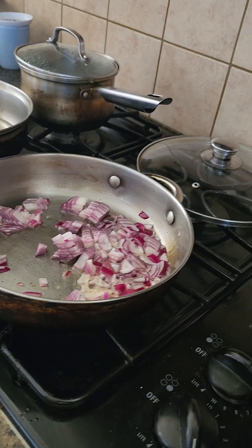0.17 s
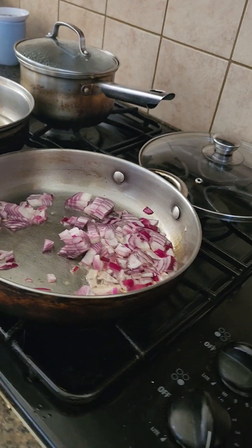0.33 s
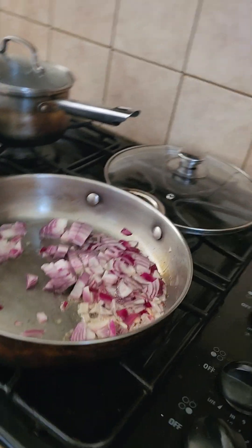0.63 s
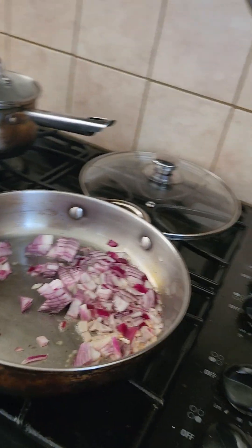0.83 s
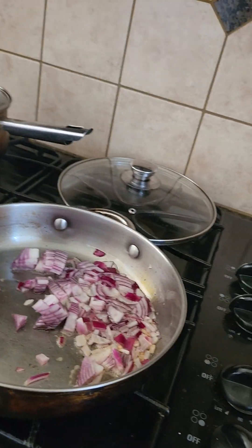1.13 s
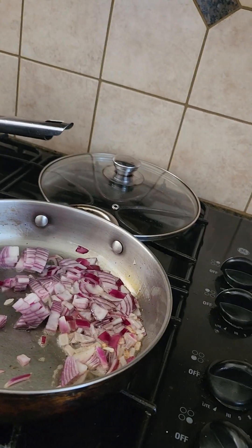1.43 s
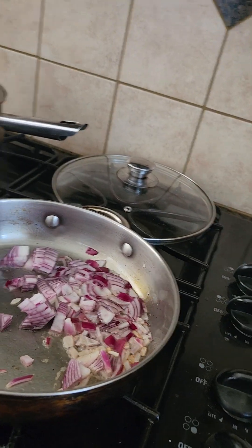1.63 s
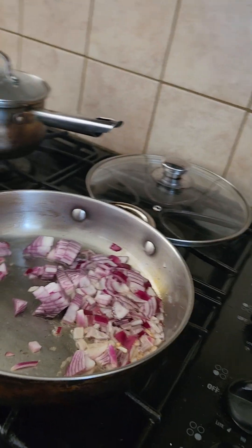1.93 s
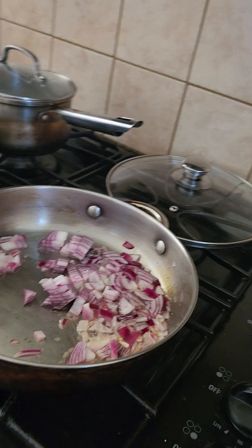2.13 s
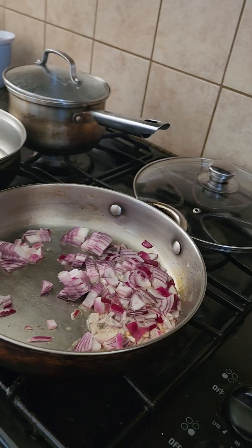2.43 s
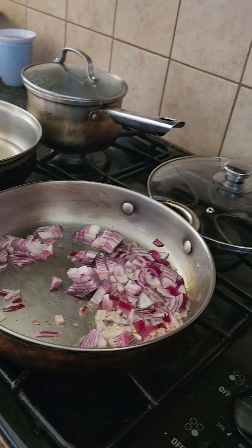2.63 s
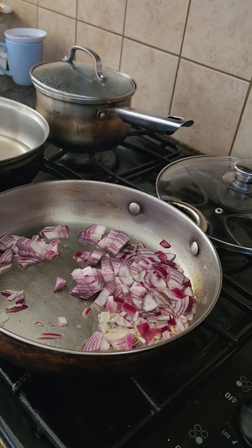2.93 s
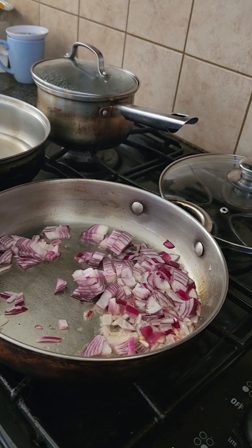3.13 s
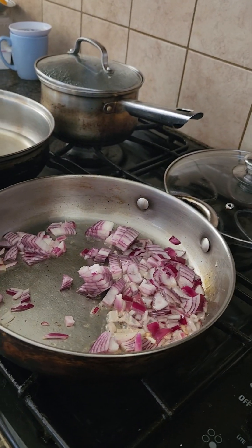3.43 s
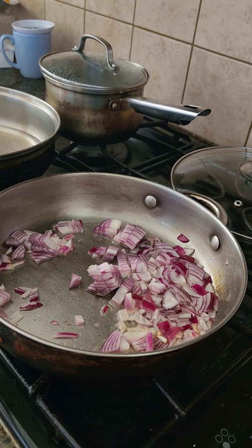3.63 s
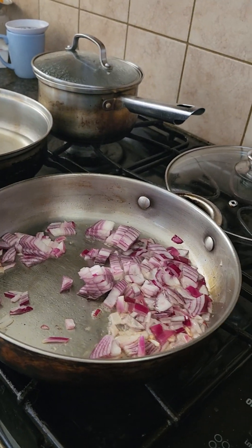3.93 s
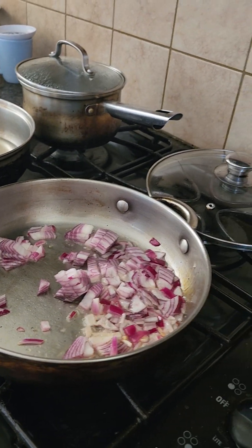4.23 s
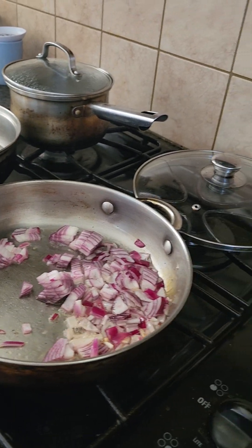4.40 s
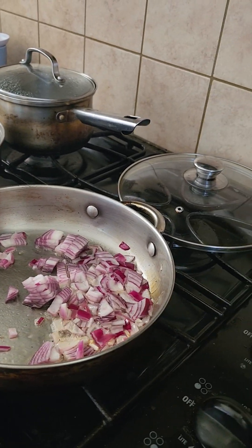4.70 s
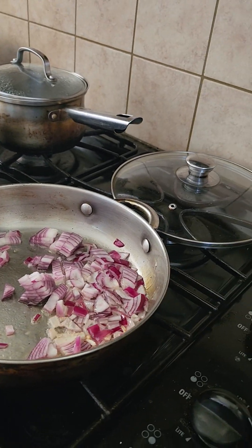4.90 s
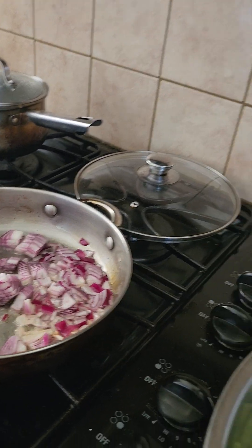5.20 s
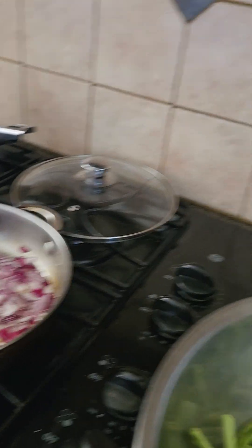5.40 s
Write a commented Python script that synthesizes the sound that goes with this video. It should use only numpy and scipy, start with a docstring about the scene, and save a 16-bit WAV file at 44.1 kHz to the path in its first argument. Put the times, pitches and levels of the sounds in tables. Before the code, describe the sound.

Onion fries close to a phone in a small hard-walled kitchen, the sizzle leaning slightly left. Quick utensil knocks and scrapes open the scene, followed by a quieter spell with snapping oil drops. From about 2.5 seconds come hard clacks, rattling scrapes and faint metallic clinks, then scattered taps to the end, over a soft gas rush and weak hum.

```python
"""Onion sizzling on a gas hob

Chopped onion sizzles in a steel skillet, close to a phone in a small tiled kitchen.
Steam bursts are random grains filtered by an oil colour; spitting drops are one-cycle snaps with spray.
A utensil knocks, scrapes and clatters: showers of tiny impacts plus damped sines. The touched metal rings
faintly as fluttering sine modes. Filtered noise is the burner's low rush; wavering sines are a hum.
"""
import sys
import numpy as np
from scipy import signal
from scipy.fft import rfft, irfft
from scipy.io import wavfile
from scipy.ndimage import uniform_filter1d

SR = 44100
rng = np.random.default_rng(int(sys.argv[2]) if len(sys.argv) > 2 else 0)


def materialize(psi):
    """Save the field psi as 16-bit PCM at rate SR to the path in sys.argv[1].

    A 1-D psi becomes a single channel; in a 2-D psi each row is a channel.
    """
    bounded = np.clip(np.atleast_2d(psi).T, -1, 1)
    quanta = np.round(bounded * 32767).astype(np.int16)
    wavfile.write(sys.argv[1], SR, quanta)


N = 244931
TIME = np.arange(N) / SR


def undb(db):
    """Decibels to gain."""
    return 10 ** (np.asarray(db) / 20)


def unit(x):
    """Scale to rms 1."""
    return x / np.sqrt(np.mean(x ** 2))


def panned(db):
    """Left and right gains of constant power, left over right by db."""
    return unit(undb(np.array([[db], [-db]]) / 2))


def add(track, start_s, sound):
    """Mix a sound into a stereo track at a time."""
    i = int(max(start_s, 0) * SR)
    track[:, i:i + sound.shape[-1]] += sound[..., :N - i]


def convolve(x, response):
    """Pass a track through an impulse response."""
    return signal.oaconvolve(x, np.atleast_2d(response), axes=-1)[:, :N]


def tint(x, colour, size=4096):
    """Minimum-phase filter through (freq_hz, gain_db) points that keeps the power of white noise."""
    hz, db = np.transpose(colour)
    bins_hz = np.maximum(np.fft.rfftfreq(size, 1 / SR), 1)
    gain_db = np.interp(np.log(bins_hz), np.log(hz), db)
    # fold the cepstrum to make the response causal
    cepstrum = irfft(np.log(undb(gain_db)))
    cepstrum[1:size // 2] *= 2
    cepstrum[size // 2 + 1:] = 0
    response = irfft(np.exp(rfft(cepstrum)))
    return convolve(x, response / np.linalg.norm(response))


def pair(three, likeness):
    """Left and right from one shared and two separate signals."""
    return np.sqrt(likeness) * three[0] + np.sqrt(1 - likeness) * three[1:]


def grains(rate_hz, spread_db, channels=3):
    """Random tiny impacts, many faint and a few strong; rms 1."""
    shape = (channels, N)
    strength = np.minimum(rng.exponential(size=shape), 5.5)
    chance = rng.uniform(-1, 1, shape)
    hit = np.abs(chance) < rate_hz / SR
    out = np.zeros(shape)
    out[hit] = np.sign(chance[hit]) * undb(spread_db * strength[hit])
    return unit(out)


def walk(rate_hz):
    """Slow chance: random levels held 1 / rate_hz and slewed twice; rms 1."""
    k = int(SR / rate_hz)
    levels = np.resize(rng.standard_normal(4000), N // k + 1)
    held = np.repeat(levels, k)[:N]
    return unit(uniform_filter1d(uniform_filter1d(held, k), k))


def kitchen(x, t60_s, wet_db, likeness):
    """Direct sound plus a short diffuse tail from tiles and worktop."""
    t = TIME[:SR // 2]
    decay = undb(-60 * t / t60_s) * (1 - np.exp(-t / .004))
    tail = pair(rng.standard_normal((3, len(t))), likeness) * decay / np.linalg.norm(decay)
    return x + undb(wet_db) * convolve(x, tail)


def ring(hz, decay_s):
    """A damped sine of unit energy."""
    t = TIME[:SR // 2]
    wave = np.sin(2 * np.pi * hz * t) * np.exp(-t / decay_s)
    return wave / np.linalg.norm(wave)


# heat under the onion: start_s, level_db (before FIZZ_TRIM_DB)
HEAT = [(0.0, -31), (0.55, -36), (1.45, -37.5), (1.9, -32.5), (2.4, -30.5), (4.6, -37), (5.55, -34)]
# oil colour: freq_hz, gain_db
OIL_COLOUR = [(300, -21), (650, -13), (900, -4.5), (1200, -7), (1650, -4.5), (1900, 1.5), (2150, -7),
              (2500, -6), (3400, -4), (5200, -1), (6500, -3.5), (9000, -0.5), (12000, 0.5), (15800, -0.5)]
FIZZ_TRIM_DB = -1.26


def sizzle():
    """Steam bubbles burst in the oil: a dense fizz, a crackle, and sparse sharp pops on top."""
    heat_db = np.interp(TIME, *np.transpose(HEAT))
    fizz_gain = undb(heat_db + FIZZ_TRIM_DB + .5 * walk(12))
    fizz = pair(grains(rate_hz=9000, spread_db=2.5), likeness=0.068) * fizz_gain
    crackle = grains(rate_hz=900, spread_db=2.0, channels=1) * undb(-47.5 + 4.3 * walk(5.62))
    pops = grains(rate_hz=150, spread_db=3.7, channels=1) * undb(-49.5)
    # the two ports hear each burst one sample apart
    bursts = crackle + pops
    near = np.vstack([np.roll(bursts, 1, axis=1), bursts])
    oil = tint(fizz + near, OIL_COLOUR) * panned(db=4.0)
    return kitchen(oil, t60_s=0.51, wet_db=-11.0, likeness=0.12)


# burner colour: freq_hz, gain_db
BURNER_COLOUR = [(30, -25), (60, 3.5), (100, -12.5), (190, -7), (260, 0.5), (330, -2.5), (430, -3),
                 (650, -15), (1200, -24), (3000, -26)]
# appliance hum: freq_hz, mid_level_db (rms, about which it wavers)
HUM_PARTIALS = [(59.5, -70.5), (119, -68), (312.2, -66.5), (376.8, -64.5)]


def hob():
    """The burner's soft rush is filtered noise; the appliance hum is sines wavering in level and phase."""
    noise = pair(rng.standard_normal((3, N)), likeness=0.82)
    rush = tint(noise, BURNER_COLOUR) * undb(-57.0 + 3.2 * walk(3.85))
    hum = np.zeros(N)
    for hz, db in HUM_PARTIALS:
        gain = np.sqrt(2) * undb(db + 2 * walk(2.96))
        hum += gain * np.sin(2 * np.pi * hz * TIME + 1.1 * walk(4.58))
    return rush + hum


# strikes: start_s, decay_s, knock_hz, level_db, weight_db (knock over level), edge_db (rasp over level)
STRIKES = [(0.013, 0.065, 460, -40.5, -4.5, -4), (0.14, 0.012, 597, -23, -5.5, 2.5),
           (0.2027, 0.025, 680, -19, 0, 5), (0.315, 0.019, 544, -26, -2, 2.5),
           (0.3326, 0.008, 560, -18, -9, -5.5), (0.3695, 0.0049, 400, -16, 7.5, -7),
           (0.394, 0.038, 370, -46.5, 20, 0), (1.6084, 0.003, 825, -28, -7.5, -6),
           (2.503, 0.0072, 428, -12, -12.5, 0), (2.508, .012, 780, -21.5, -1.5, 1),
           (2.6087, 0.0064, 725, -14, -5, -3), (2.705, 0.032, 885, -29.5, -3.5, -4.5),
           (2.753, 0.012, 686, -25.5, 0.5, 3), (2.813, 0.015, 540, -31.5, -4, 5.5),
           (2.895, 0.018, 520, -28.5, -9, 12), (2.944, 0.014, 685, -18, -5, -2),
           (3.031, .014, 580, -21, -19, -4), (3.097, 0.013, 487, -23, -16, -2),
           (3.144, 0.022, 427, -26, -4.5, 3.5), (3.246, 0.024, 590, -29, 3, 4.5),
           (3.271, .018, 432, -21, -15, 0.5), (3.387, 0.018, 460, -27.5, -8.5, 9),
           (3.508, 0.016, 720, -31.5, -12, -4.5), (3.574, .019, 616, -29, -10, 4.5),
           (3.786, .014, 540, -23.5, -8, 1.5), (4.146, .014, 540, -24.5, -12, 3.5),
           (4.2424, .008, 503, -29.5, -5, 7), (4.343, 0.028, 377, -29, -3, 7),
           (4.777, 0.0052, 590, -39, -15, 2), (4.875, 0.016, 540, -26.5, -12, 6),
           (5.045, 0.0073, 627, -18.5, -10.5, -4.5), (5.118, .015, 450, -32.5, -8.5, 3.5),
           (5.168, 0.0063, 490, -25.5, -2.5, 7), (5.228, 0.023, 640, -25.5, -6.5, -5),
           (5.341, .0105, 594, -30, -8.5, -5.5)]
# slides: start_s, slide_s, level_db, weight_db, edge_db
SLIDES = [(0.126, 0.0086, -28, -10, 0.5), (0.152, 0.013, -26, -3, -.5), (0.206, .028, -22.5, -18, -0.5),
          (0.276, .025, -28, -11, 2.5), (2.784, 0.022, -34.5, -4.5, -5), (2.862, .012, -31, -3, 1),
          (3.008, .008, -33.5, -2, -4.5), (3.204, 0.032, -35, -14, -0.5), (3.295, .07, -37, -9, 5),
          (3.759, 0.011, -37, -9, 3.5), (3.802, 0.023, -24.5, -7, 7.5), (3.844, 0.038, -25.5, -5, 5.5),
          (4.167, 0.038, -32.5, -3.5, 2.5), (4.25, .055, -30, -3, 0), (4.666, 0.022, -50.5, 3.5, -12),
          (4.943, 0.011, -36, -6.5, 9), (5.15, 0.011, -36, -13, 3)]
BLOW_HOLD_S = 0.0016
SCRAPE_DECAY_S, SCRAPE_KNOCK_HZ = 0.025, 524


def contacts():
    """Strikes and slides alike: start_s, slide_s, decay_s, knock_hz, level_db, weight_db, edge_db."""
    blows = [(start, BLOW_HOLD_S, *rest) for start, *rest in STRIKES]
    scrapes = [(start, slide, SCRAPE_DECAY_S, SCRAPE_KNOCK_HZ, *levels)
               for start, slide, *levels in SLIDES]
    return blows + scrapes


def shower(t, slide_s, decay_s):
    """Strength of a contact's tiny impacts: it builds and holds through the slide, then dies away."""
    rise_s = .0004 + .04 * slide_s
    return (1 - np.exp(-t / rise_s)) * np.exp(-np.maximum(t - slide_s, 0) / decay_s)


# contact colours: freq_hz, gain_db
THUD_COLOUR = [(40, -23.5), (70, -7), (105, -14), (140, 1), (210, -4.5), (290, -9), (450, -41), (900, -71)]
KNOCK_COLOUR = [(100, -46.5), (230, -16.5), (320, 6), (450, 1.5), (700, 3), (950, -3), (1400, -37),
                (3500, -42)]
CLACK_COLOUR = [(400, -53), (850, -12), (1200, 2.5), (1900, 0.5), (2900, 0.5), (4300, -3), (5400, -6.5),
                (7500, -13), (14000, -60)]
RASP_COLOUR = [(2000, -39), (4500, -1), (5800, -5.5), (7200, -4.5), (8700, 1), (10500, 1), (12500, -1),
               (15800, -3)]
# lean of the utensil on the worktop: start_s, extra_thud_db
LEAN_CURVE = [(0.33, -9), (0.37, 2), (2.62, 4), (2.72, 12), (2.89, 5.5), (2.95, 14.5), (3.3, -0.5),
              (3.8, -3.5), (4.3, 2)]
# a sharper edge clacks higher; the utensil is nearly straight ahead
CLACK_HZ, CLACK_OCTAVES_PER_DB, UTENSIL_PAN_DB = 2250, 0.12, 1.2
# thud over contact level; a deeper knock than a scrape's thuds more
THUD_DB, THUD_DB_PER_OCTAVE = -14.5, 10.5


def utensil():
    """Each contact is a shower of tiny impacts, coloured by a resonance that depends on the spot it touches.
    A clean blow also pushes the body once: a hollow knock over the thud of the worktop."""
    pressure, blows = np.zeros((4, 2, N)), np.zeros((2, N))
    t = TIME[:SR // 3]
    sides = panned(UTENSIL_PAN_DB)
    for start, slide, decay, knock_hz, db, weight_db, edge_db in contacts():
        clack_hz = CLACK_HZ * 2 ** (CLACK_OCTAVES_PER_DB * edge_db)
        depth_octaves = np.log2(SCRAPE_KNOCK_HZ / knock_hz)
        lean_db = np.interp(start, *np.transpose(LEAN_CURVE))
        thud_db = THUD_DB + THUD_DB_PER_OCTAVE * depth_octaves + lean_db
        thud, knock, clack, rasp = undb(db + np.array([thud_db, weight_db, 0, edge_db]))
        # share of the low energy in the first blow
        clean = 0.66 * np.exp(-slide / 0.0078)
        rattle = np.sqrt(1 - clean)
        shape = shower(t, slide, decay) * (1 + 0.19 * clean * np.exp(-t / 0.00064))

        blow = thud * ring(164.4, 0.0048) + knock * ring(knock_hz, 0.0017)
        blow += undb(-7.5) * np.sqrt(knock * clack) * ring(clack_hz, 0.0043)
        add(blows, start, np.sqrt(clean) * np.linalg.norm(shape) * blow)

        impacts = shape * pair(rng.standard_normal((3, len(t))), likeness=0.44)
        clatter = convolve(impacts, ring(clack_hz, 0.00042)[:SR // 100])
        add(blows, start, undb(-5.5) * clack * sides * clatter)

        gains = (thud * rattle, knock * rattle, undb(-1.5) * clack * sides, rasp * sides)
        for track, gain in zip(pressure, gains):
            add(track, start, gain * shape)
    # the edge sticks and slips, in fine grit and in coarser jerks
    pressure = pressure * undb(1.7 * walk(600) + 1.5 * walk(140) - .6)
    thud = tint(pressure[0] * pair(grains(rate_hz=3400, spread_db=3), likeness=1.0), THUD_COLOUR)
    knock = tint(pressure[1] * pair(grains(rate_hz=3000, spread_db=1), likeness=0.75), KNOCK_COLOUR)
    clack = tint(pressure[2] * pair(grains(rate_hz=6000, spread_db=3.0), likeness=0.21), CLACK_COLOUR)
    rasp = tint(pressure[3] * pair(grains(rate_hz=11000, spread_db=1.5), likeness=0.046), RASP_COLOUR)
    # small bodies radiate no deep bass
    highpass = signal.butter(4, 125, "high", fs=SR, output="sos")
    blows = signal.sosfilt(highpass, blows)
    body = kitchen(thud, t60_s=0.38, wet_db=-4, likeness=0.96)
    body += kitchen(knock + blows, t60_s=.34, wet_db=-7.0, likeness=0.85)
    edge = kitchen(clack, t60_s=0.31, wet_db=-2.0, likeness=0.32)
    edge += kitchen(rasp, t60_s=0.26, wet_db=-6, likeness=0)
    return body + edge


# modes of the metal: freq_hz, level_db (relative), t60_s
METAL_MODES = [(1146, -2, .4), (1580, -4, .14), (2275, -2, .36), (2950, -7, .25), (3378, 0, .3),
               (4230, -8, .16), (6365, -2, .22), (7100, -3, .14), (8270, -5, .16), (8480, -3, .18),
               (8672, -3, .36), (9017, -3, .18), (9355, -5, .17), (9712, -2, .16), (10850, -2, .16),
               (11110, -3, .16), (11300, -3, .18), (12320, -2, .15), (12870, -1, .15), (13510, -3, .14),
               (14370, -2, .14), (15070, -2, .14)]
# contacts that set it ringing: start_s, level_db (before CLINK_TRIM_DB), centre_hz, spread_octaves
CLINK_EVENTS = [(0.139, -19, 11300, .4), (0.28, -26, 8700, .2), (2.608, -22, 1570, .17),
                (2.895, -23, 8350, 0.044), (2.896, -16.5, 12900, .12), (2.946, -26, 2430, 0.42),
                (3.098, -27.5, 2250, .3), (3.145, -24, 8650, 0.26), (3.272, -32, 10500, .5),
                (3.388, -19, 10700, 0.32), (3.85, -18, 10200, .45), (4.345, -29.5, 3380, .06),
                (4.345, -31, 6400, .11), (3.82, -30, 4230, .1)]
CLINK_SLIDE_S, CLINK_TRIM_DB = 0.0065, -5.0  # rubbed this long before ringing freely


def clinks():
    """Where the metal is touched decides which of its modes ring; it keeps chattering, so each ring flutters."""
    out, t = np.zeros((2, N)), TIME[:SR // 3]
    hz, mode_db, t60_s = np.transpose(METAL_MODES)
    for start, db, centre_hz, spread in CLINK_EVENTS:
        distance = np.log2(hz / centre_hz) / spread
        weights = undb(mode_db) * np.exp(-.5 * distance ** 2) + 1e-18
        weights = np.sqrt(2) * weights / np.linalg.norm(weights)
        # shorter waves reach the two ports further out of step
        side_shift = rng.uniform(-1, 1, (len(hz), 2, 1)) * hz[:, None, None] / 5000
        phases = rng.uniform(0, 2 * np.pi, (len(hz), 1, 1)) + side_shift
        chatter = rng.standard_normal((len(hz), 2, 40))
        knots = np.linspace(0, t[-1], chatter.shape[-1])
        for k in np.flatnonzero(weights > .05):
            flutter, wobble = (np.interp(t, knots, c) for c in chatter[k])
            rub = np.minimum(t / CLINK_SLIDE_S, 1)
            swell = rub * shower(t, CLINK_SLIDE_S, t60_s[k] / np.log(1000))
            wave = np.sin(2 * np.pi * hz[k] * t + phases[k] + .6 * wobble)
            tone = undb(3 * flutter) * wave
            add(out, start, undb(db + CLINK_TRIM_DB) * weights[k] * swell * tone)
    return kitchen(out, t60_s=.22, wet_db=-9, likeness=.1)


DROP_DB, DROP_SCATTER_DB = -18, 2.5
DROP_HZ, DROP_SCATTER_OCTAVES = 10700, .2


def drops(count):
    """Small drops at random moments, scattered in level and pitch: start_s, level_db, pitch_hz."""
    out = []
    for when, loud, high in rng.uniform(-1.1, 1, (count, 3)):
        start_s = .5 * (1 + when) * TIME[-1]
        level_db = DROP_DB + DROP_SCATTER_DB * loud
        pitch_hz = DROP_HZ * 2 ** (DROP_SCATTER_OCTAVES * high)
        out.append((start_s, level_db, pitch_hz))
    return out


# big drops that spit: start_s, level_db (snap peak before colour and pan), pitch_hz
BIG_DROPS = [(0.624, -15, 8800), (1.0873, -13.5, 9500), (1.6775, -7, 7800), (2.126, -5.5, 10000),
             (2.221, -12.5, 12400), (4.0742, -10, 7500), (5.4488, -13.5, 7700), (5.4732, -14.5, 7600)]
# snap colour: freq_hz, gain_db
SNAP_COLOUR = [(400, -27), (1500, 10), (4000, 9.5), (7000, -5.5), (11000, 3), (15800, -7)]
SKILLET_PAN_DB = 5.5  # to the left


def spits():
    """A drop bursts with a snap of one cycle; the skillet wall returns it, and big drops throw more spray."""
    out, t = np.zeros((2, N)), TIME[:SR // 20]
    snap_s = t[16]  # snap centre within the burst
    for start, db, hz in BIG_DROPS + drops(count=14):
        cycles = (t - snap_s) * hz
        snap = np.cos(2 * np.pi * cycles) * np.exp(-2 * cycles ** 2)
        spray = undb(-15.5 + .6 * db) * rng.standard_normal((2, len(t))) * np.exp(-t / .0025)
        burst = undb(db) * panned(SKILLET_PAN_DB) * (snap + spray)
        add(out, start - snap_s, burst)
        add(out, start + .001, undb(-12) * burst)  # wall return
    return kitchen(tint(out, SNAP_COLOUR), t60_s=0.067, wet_db=-3.0, likeness=0.1)


def scene():
    """Everything at the stove."""
    return sizzle() + hob() + utensil() + clinks() + spits()


TOP_HZ = 15900


def record(dry):
    """The phone clips peaks at full scale, then a steep low-pass cuts the top."""
    lowpass = signal.ellip(12, .2, 75, TOP_HZ, fs=SR, output="sos")
    return signal.sosfilt(lowpass, np.clip(dry, -1, 1))


dry = scene()
out = record(dry)
materialize(out)
```